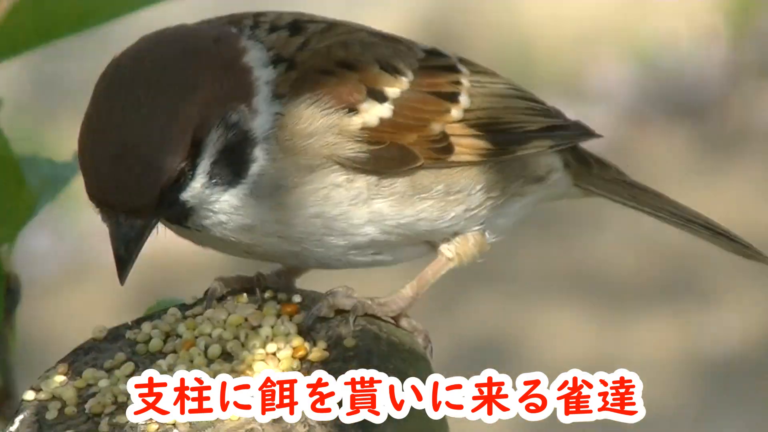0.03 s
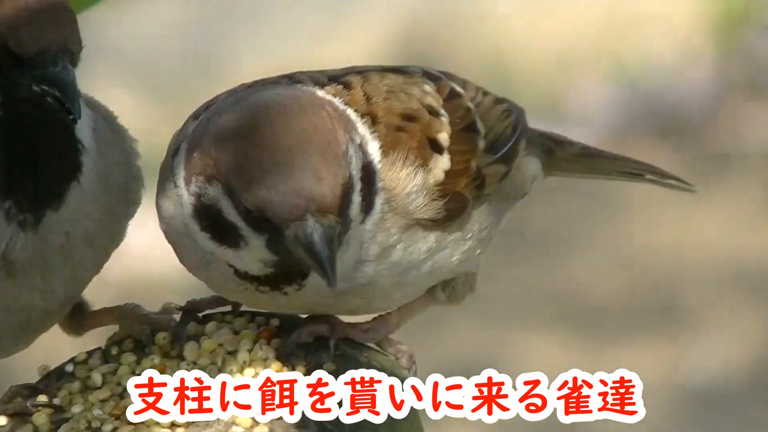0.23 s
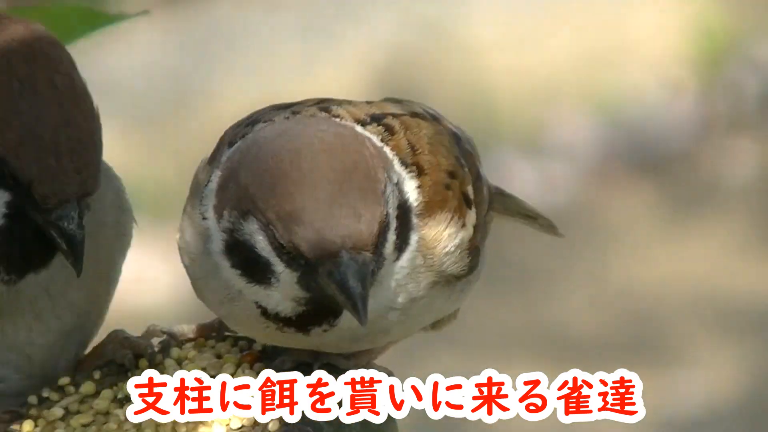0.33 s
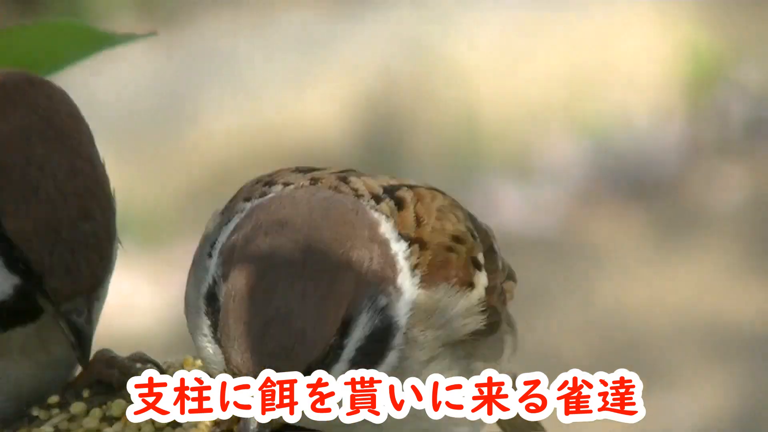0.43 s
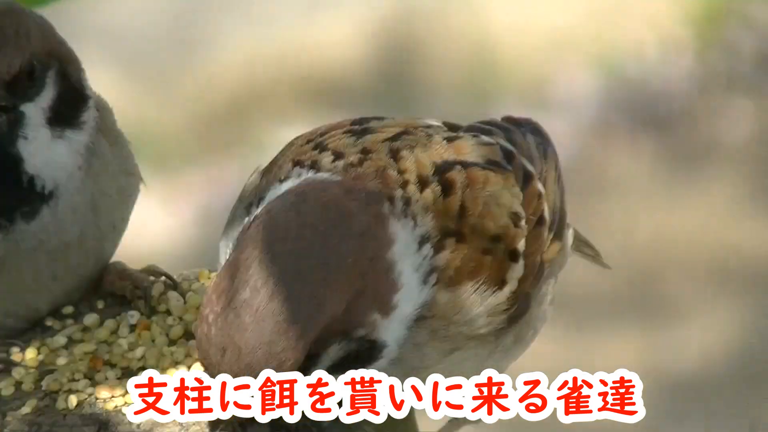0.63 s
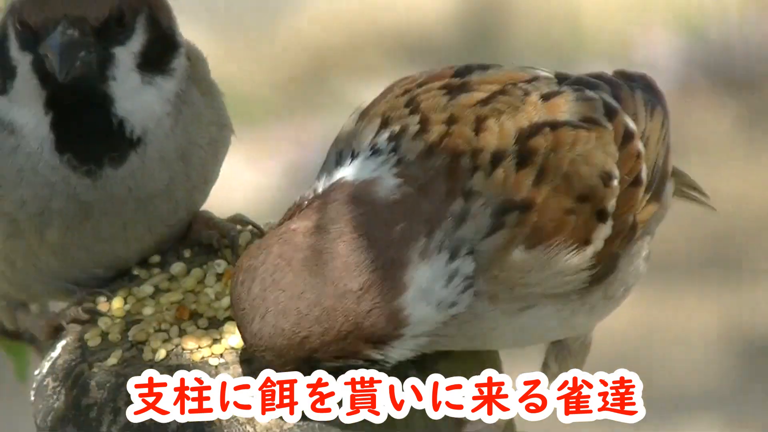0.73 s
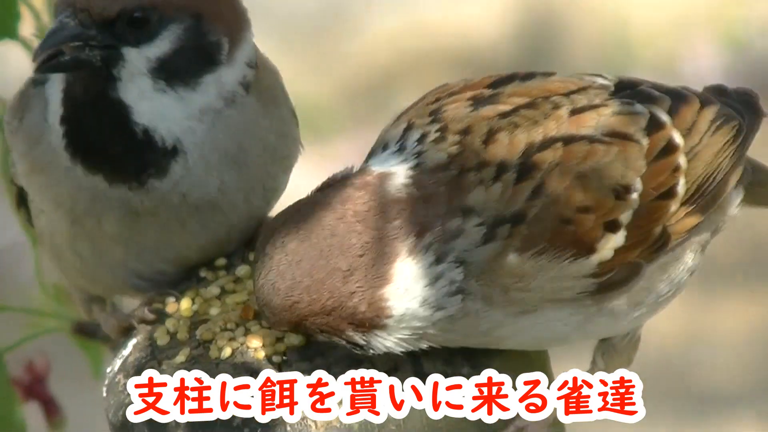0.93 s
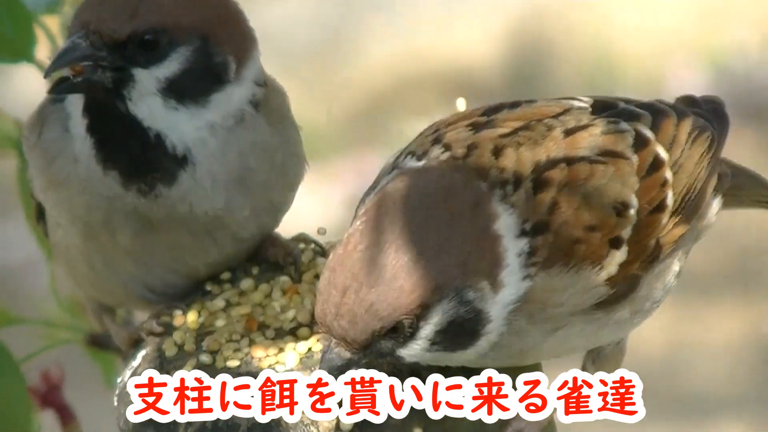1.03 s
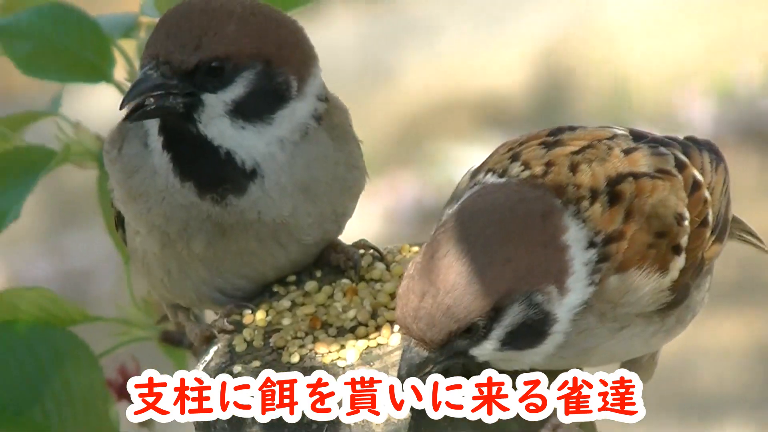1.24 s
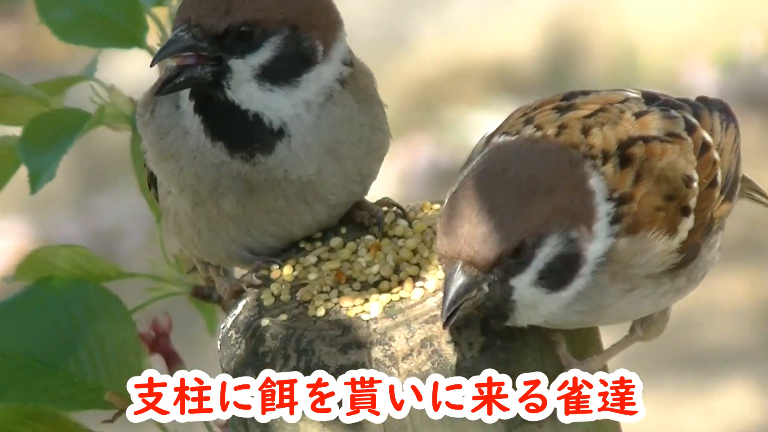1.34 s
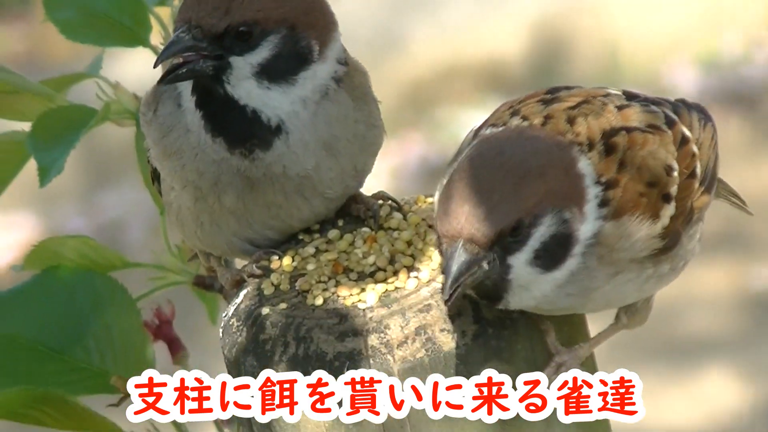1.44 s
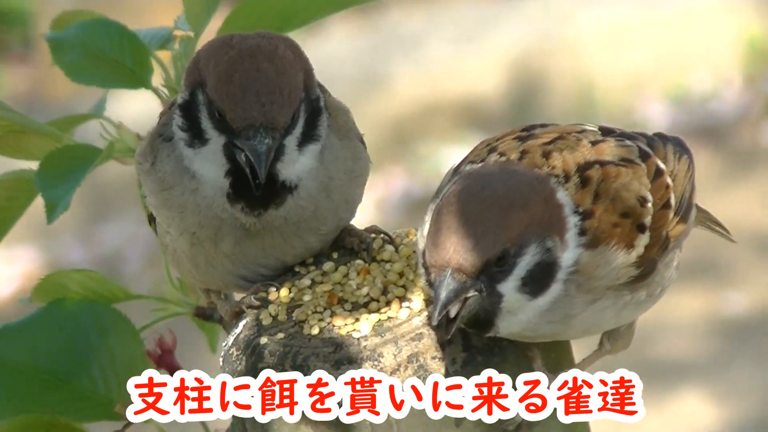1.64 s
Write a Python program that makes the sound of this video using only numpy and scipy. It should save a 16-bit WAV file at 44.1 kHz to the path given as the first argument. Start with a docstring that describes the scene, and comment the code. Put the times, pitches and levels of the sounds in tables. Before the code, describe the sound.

Two sharp sparrow chirps, one clear and one harsh, amid light pecking and rustling.

```python
"""Two sparrows feeding

Over a soft outdoor hush, feet and feathers rustle, husks crack and beaks knock on a seed-covered post.
One sparrow gives a clear chirp, sounding both sides of its voice box at once; then comes a harsh,
trilled chirp. A distant bird answers faintly with two whistles, and there is one tiny squeak.
The calls are sliding tones, the feeding noises are shaped hiss, and the garden adds short echoes."""
import sys
import numpy as np
from scipy import signal
from scipy.fft import rfft, irfft
from scipy.io import wavfile
from scipy.ndimage import uniform_filter1d

SR = 44100
rng = np.random.default_rng(int(sys.argv[2]) if len(sys.argv) > 2 else 0)


def transcribe(signal):
    """Save signal, clipped to [-1, 1], as a 16-bit WAV file at the path in sys.argv[1]."""
    frames = np.atleast_2d(signal).T
    limited = np.clip(frames, -1, 1)
    pcm = np.round(limited * 32767).astype(np.int16)
    wavfile.write(sys.argv[1], SR, pcm)


N = 74970
T = np.arange(N) / SR

# tone colour of the outdoor hush: f/Hz, level/dB
HUSH_COLOUR = [(15, -56), (25, -36), (69, -11), (148, -2.5), (260, 1.5), (340, -1), (482, -1), (552, -4),
               (762, -4.5), (1750, -10.5), (2120, -15), (3930, -21), (4380, -25.5), (9550, -32),
               (15500, -43.5)]
# loudness of the hush: t/s, level/dB
HUSH_LEVEL = [(0, -49.5), (.45, -50), (.8, -50.5), (1.2, -52), (1.7, -51)]
# how alike the hush is in both ears: f/Hz, likeness/0-1
HUSH_LIKENESS = [(30, 0.83), (120, 1), (500, 0.97), (1200, 0.93), (3000, 0.66), (12000, 0.87)]
# light, constant scratching among the seeds: t/s, level/dB
SCRATCHING = [(0, -59), (.2, -59), (.5, -60), (.7, -59.5), (.9, -60), (1.2, -62), (1.4, -61.5),
              (1.52, -62.5), (1.7, -64.5)]
# a bird shifts its feet and feathers: t/s, length/s, level/dB
SHUFFLES = [(-.02, 0.06, -52.5), (.11, 0.045, -67), (0.364, 0.096, -57.5), (0.453, 0.064, -48.5),
            (0.654, 0.076, -65), (0.743, 0.054, -63), (1.262, 0.056, -54), (1.396, 0.066, -57.5)]
# tone colour of the rustling: f/Hz, level/dB
RUSTLE_COLOUR = [(60, -55), (800, 1), (2000, 7.5), (3500, 2.5), (7000, -2), (11000, -9.5), (16000, -20)]
# husks cracking, plus a brief rustle of feet and feathers near 3 kHz around 1.45 s: t/s, level/dB, centre f/Hz,
# fade time/s
CRACKS = [(.0349, -41, 4440, 0.0019), (.0663, -44.5, 4320, 0.0019), (.435, -51.5, 7000, 0.0044),
          (.4859, -41.5, 3940, 0.0037), (.52, -48.5, 6000, 0.0026), (.5532, -50, 5840, 0.0038),
          (.594, -49.5, 6140, 0.0027), (.636, -51, 6900, 0.0042), (.8146, -47.5, 4530, 0.0017),
          (.864, -42, 2580, 0.0036), (.914, -51, 3460, 0.0034), (1.121, -45.5, 2950, 0.0026),
          (1.2327, -42.5, 2360, 0.0025), (1.329, -39.5, 9600, 0.00086), (1.4492, -38, 3070, 0.0055),
          (1.4542, -34.5, 3170, 0.00057), (1.4645, -43.5, 2700, 0.0061), (1.47, -46, 3180, 0.0029)]
# beak knocks on the post: t/s, level/dB, centre f/Hz
KNOCKS = [(.066, -39.5, 1290), (0.43, -38.5, 800), (0.431, -41.5, 880), (.465, -39, 330), (0.487, -49, 945),
          (0.509, -43, 870), (0.551, -35.5, 760), (0.551, -44, 930), (.594, -44.5, 900), (.628, -42, 600),
          (.633, -47, 900), (.668, -52, 700), (1.081, -44.5, 1250), (1.378, -47, 1440)]
# lower voice of the clear chirp: t/s, f/Hz, level/dB, overtone level/dB
LOW_VOICE = [(.198, 2150, -68, -72), (.214, 2060, -38.5, -33), (.232, 2030, -35, -38),
             (.239, 2252, -33.5, -44), (.246, 2776, -31, -35), (.253, 3394, -30.5, -59),
             (.262, 3620, -25.5, -44), (.269, 3700, -26.5, -46.5), (.278, 3418, -22.5, -33),
             (.286, 3210, -25.5, -38.5), (.298, 3200, -21, -38), (.308, 2986, -19.5, -35),
             (.315, 2667, -21, -32.5), (.324, 2355, -22, -36), (.334, 1728, -34, -36.5),
             (.345, 1440, -67, -44)]
# the lower voice loses its grip as it falls: t/s, roughness/0-1, flutter depth/0-1
LOW_SHAKE = [(.2, 0.4, 0), (.215, 0.1, 0), (.3, 0.15, 0.16), (.314, 0.05, 0.65), (.326, 0.21, 0.13),
             (.34, 0.24, 0.25)]
# upper voice of the clear chirp: t/s, f/Hz, level/dB
HIGH_VOICE = [(.198, 2800, -68), (.211, 2766, -40.5), (.222, 2580, -42), (.231, 2560, -45),
              (.241, 3020, -33), (.248, 3720, -34), (.254, 4720, -19.5), (.261, 4960, -20),
              (.27, 4980, -18.5), (.275, 4230, -40), (.279, 4200, -68)]
# extra tones where the voices mix: multiple of low pitch, multiple of high pitch, level/dB
# (counted from halfway between the upper voice's level and the lower voice's overtone level)
BLENDS = [(1, 1, -2.5), (0, 2, -15), (2, 1, -21), (1, 2, -23)]
# buzz of the two voices beating together as the chirp starts: t/s, level/dB
START_BUZZ = [(.2, -62), (.211, -40.5), (.221, -43.5), (.231, -66), (.245, -58), (.255, -61)]
# tone colour of air in the throat: f/Hz, level/dB
BREATH_COLOUR = [(200, -59), (1200, -12.5), (2200, -4.5), (4500, 2), (7000, -9.5), (9500, -3.5),
                 (12000, -11.5), (16000, -29)]
# treble lost on the way out of the beak: f/Hz, level/dB
BEAK_FILTER = [(1000, -3), (7000, -2), (10500, -5), (13000, -7), (16000, -2)]
# loudness of the harsh chirp: t/s, level/dB, overtone level/dB
HARSH_LEVEL = [(.918, -68, -56), (.928, -63, -43), (.942, -46, -41.5), (.952, -42, -29), (.958, -28, -43),
               (.965, -22, -43), (.972, -25.5, -38), (.977, -19.5, -37), (.983, -26.5, -30),
               (.991, -30.5, -32.5), (.998, -25, -36.5), (1.007, -25.5, -37), (1.017, -38, -48.5),
               (1.025, -38, -46.5), (1.03, -44, -66)]
# the pitch its trill swings around: t/s, f/Hz
HARSH_PITCH = [(.92, 3450), (.942, 3150), (.951, 2300), (.957, 3900), (.962, 4300), (.977, 3870),
               (.984, 3650), (.991, 2650), (.997, 2920), (1.007, 2780), (1.017, 2480), (1.028, 2600)]
# how rough it is: t/s, roughness/0-1
HARSH_ROUGHNESS = [(.92, .8), (.948, .8), (.956, .13), (1.012, .13), (1.025, .5)]
# its trill: t/s, rate/Hz, depth/share of pitch
TRILL = [(.957, 92, 0), (.966, 92, .13), (.982, 103, .13), (.992, 100, .21), (.998, 143, .16),
         (1.006, 157, .14)]
# the distant bird, one list for each whistle: t/s, f/Hz, level/dB
FAR_WHISTLES = [
    [(1.04, 3100, -52), (1.06, 3250, -57), (1.083, 3510, -58), (1.11, 3410, -54.5), (1.128, 3150, -55)],
    [(1.09, 5250, -70), (1.12, 4950, -70), (1.133, 3980, -62), (1.16, 3350, -64), (1.172, 3280, -64)],
]
# echoes from the post and fence: delay/s, level/dB
ECHOES = [(.0031, -24), (.0058, -21), (.0125, -27)]


def amp(db):
    """Turns decibels into a number to multiply by."""
    return 10 ** (np.asarray(db) / 20)


def evened(x):
    """Scales a signal to an average strength (rms) of 1."""
    return x / np.sqrt(np.mean(x ** 2) + 1e-20)


def curves(table):
    """Joins a timed table's points with lines, giving one curve per column."""
    times, *columns = np.transpose(table)
    return [np.interp(T, times, column) for column in columns]


def during(table):
    """One while a timed table lasts and zero outside it, with soft edges."""
    return uniform_filter1d(1. * ((T > table[0][0]) & (T < table[-1][0])), size=90)


def spectrum(points):
    """Fills in a table's value at every frequency."""
    hz, value = np.transpose(points)
    return np.interp(np.log(np.fft.rfftfreq(N, 1 / SR) + 1), np.log(hz + 1), value)


def colour(x, points):
    """Turns each frequency up or down as a table says."""
    return irfft(rfft(x) * amp(spectrum(points)), N)


def noise(points):
    """Hiss of strength 1 with a given tone colour."""
    return evened(colour(rng.standard_normal(N), points))


def wander(hz):
    """A random wobble, up to about the given speed."""
    keep_slow = np.exp(-.5 * (np.fft.rfftfreq(N, 1 / SR) / hz) ** 2)
    return evened(irfft(rfft(rng.standard_normal(N)) * keep_slow, N))


def phase_of(hz):
    """How far a wave has turned, in radians, as its pitch slides."""
    return 2 * np.pi * np.cumsum(uniform_filter1d(hz, size=110)) / SR


def outdoor_hush():
    """Soft distant noise, nearly the same in both ears."""
    likeness = spectrum(HUSH_LIKENESS)
    shared = irfft(rfft(noise(HUSH_COLOUR)) * np.sqrt((1 + likeness) / 2), N)
    side = irfft(rfft(noise(HUSH_COLOUR)) * np.sqrt((1 - likeness) / 2), N)
    return amp(curves(HUSH_LEVEL)[0]) * np.array([shared + side, shared - side])


def rustling(scratches_per_s=2000, spread_db=1):
    """Tiny scratches of claws and feathers, swelling when a bird shifts."""
    sizes = amp(spread_db * np.minimum(rng.exponential(1, N), 4)) * rng.standard_normal(N)
    scratches = rng.random(N) < scratches_per_s / SR
    grains = evened(colour(sizes * (scratches + .14), RUSTLE_COLOUR))  # a little hiss fills the gaps
    level = amp(curves(SCRATCHING)[0])
    for start, length, db in SHUFFLES:
        level += amp(db) * np.sin(np.pi * np.clip((T - start) / length, 0, 1))
    return level * grains


def tap(start, db, centre_hz, fade_s, width_octaves):
    """A short blow with no ring: a burst of noise around one pitch that dies quickly."""
    hz = np.fft.rfftfreq(N, 1 / SR) + 1
    band = np.exp(-.5 * (np.log2(hz / centre_hz) / width_octaves) ** 2)
    fade = (T >= start) * np.exp(-abs(T - start) / fade_s)
    burst = irfft(rfft(fade * rng.standard_normal(N)) * band, N)
    return amp(db) * evened(burst) * np.sqrt(np.mean(fade ** 2))


def husk_cracks():
    """Seed husks split with short, bright clicks; around 1.45 s a brief rustle of feet sounds as similar
    bursts."""
    return sum(tap(*crack, width_octaves=0.68) for crack in CRACKS)


def beak_knocks():
    """Beaks hit the post with low, dull taps."""
    return sum(tap(*knock, fade_s=0.0063, width_octaves=0.97) for knock in KNOCKS)


def voice(phase, db, overtone_db, step_db, rough, shake_hz):
    """One side of the voice box: a shaky tone with four overtones, each weaker than the last."""
    phase = phase + rough * wander(shake_hz)
    overtones = sum(amp(overtone_db + step_db * k) * np.sin((k + 2) * phase) for k in range(4))
    tremble = (1 + rough * wander(shake_hz)) / np.sqrt(1 + rough ** 2)
    return (amp(db) * np.sin(phase) + overtones) * tremble


def clear_chirp(flutter_hz=220, high_rough=0.17, buzz_step_db=-5.5, breath_db=-27, puff_db=-48):
    """Both sides of the voice box rise and mix; the upper stops and the lower falls, fluttering."""
    low_hz, low_db, overtone_db = curves(LOW_VOICE)
    high_hz, high_db = curves(HIGH_VOICE)
    rough, flutter_depth = curves(LOW_SHAKE)
    low_phase = phase_of(low_hz)
    high_phase = phase_of(high_hz) + high_rough * wander(790)
    lower = voice(low_phase, low_db, overtone_db, step_db=-9, rough=rough, shake_hz=470)
    lower *= 1 + flutter_depth * np.sin(2 * np.pi * flutter_hz * T)
    halfway_db = (high_db + overtone_db) / 2
    blends = sum(amp(db + halfway_db) * np.sin(a * low_phase + b * high_phase) for a, b, db in BLENDS)
    buzz = np.zeros(N)
    for count in range(2, 6):  # every sum of two to five pitches, each one low or high
        for highs in range(count + 1):
            phase = (count - highs) * low_phase + highs * high_phase + 2 * np.pi * rng.random()
            buzz += amp(buzz_step_db * (count - 2.5)) * np.sin(phase)
    upper = amp(high_db) * np.sin(high_phase) + blends + amp(curves(START_BUZZ)[0]) * buzz
    puff = amp(puff_db) * np.exp(-((T - .212) / .024) ** 2)  # extra air as the chirp starts
    breath = (amp(breath_db) * (amp(low_db) + amp(high_db)) + puff) * noise(BREATH_COLOUR)
    return np.sqrt(2) * (lower + upper * during(HIGH_VOICE) + breath) * during(LOW_VOICE)


def harsh_chirp(crest_s=.9655, dip_boost_db=12, second_db=-31, second_ratio=1.33):
    """A hiss that breaks into a falling tone with a quickening trill."""
    hz, = curves(HARSH_PITCH)
    rough, = curves(HARSH_ROUGHNESS)
    db, overtone_db = curves(HARSH_LEVEL)
    rate, depth = curves(TRILL)
    swing = phase_of(rate)
    trill = depth * np.cos(swing - np.interp(crest_s, T, swing))
    phase = phase_of(hz * (1 + trill))
    swell_db = -dip_boost_db * trill / depth.max()  # overtones swell in each dip of the trill
    tone = voice(phase, db, overtone_db + swell_db, step_db=-14, rough=rough, shake_hz=566)
    # the other side of the voice box joins briefly
    second = amp(second_db) * np.exp(-((T - .99) / .02) ** 2) * np.sin(second_ratio * phase)
    # the breath follows the loudness of both the overtones and the tone
    breath = np.hypot(amp(overtone_db - 3.5), amp(db - 16.5)) * noise(BREATH_COLOUR)
    return (np.sqrt(2) * (tone + second) + breath) * during(HARSH_LEVEL)


def far_bird(rough=0.36):
    """Two thin whistles from the trees: one arches, the other falls."""
    out = np.zeros(N)
    for whistle in FAR_WHISTLES:
        hz, db = curves(whistle)
        phase = phase_of(hz) + rough * wander(150)
        out += np.sqrt(2) * amp(db) * np.sin(phase) * during(whistle)
    return out


def squeak(at_s=1.2, width_s=0.0043, hz=9800, db=-58.5, rough=.6):
    """One tiny, high squeak: a wobbly tone that is gone at once."""
    swell = np.exp(-((T - at_s) / width_s) ** 2)
    return amp(db) * swell * np.sin(2 * np.pi * hz * T + rough * wander(400))


def garden_echoes(x, width=0.21, tail_db=-23, tail_s=0.29):
    """Adds a few near echoes and a faint tail of sound scattered by the leaves."""
    shared, side = rng.standard_normal((2, N)) * amp(-60 * T / tail_s) * (T > .004)
    response = np.array([shared + width * side, shared - width * side])
    response *= amp(tail_db) / np.linalg.norm(response[0])
    response[:, 0] += 1  # the sound that comes straight to the ear
    for delay, db in ECHOES:
        response[:, round(delay * SR)] += amp(db)
    return signal.fftconvolve(x[None], response, axes=1)[:, :N]


def scene():
    """Feeding noises and calls echo in the garden, over the hush."""
    feeding = beak_knocks() + husk_cracks() + rustling()
    chirps = colour(clear_chirp() + harsh_chirp(), BEAK_FILTER)
    return garden_echoes(feeding + chirps + far_bird() + squeak()) + outdoor_hush()


def record(dry):
    """Cuts away the very highest treble."""
    treble_cut = signal.firwin(511, cutoff=15900, window=("kaiser", 9), fs=SR)
    return signal.oaconvolve(dry, treble_cut[None], "same")


dry = scene()
out = record(dry)
transcribe(out)
```